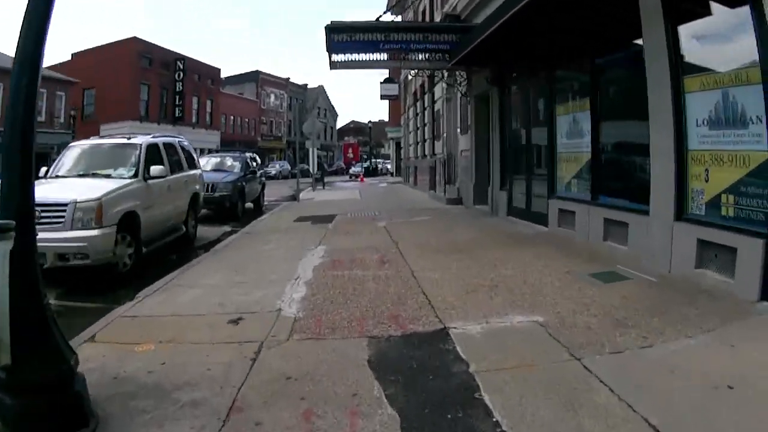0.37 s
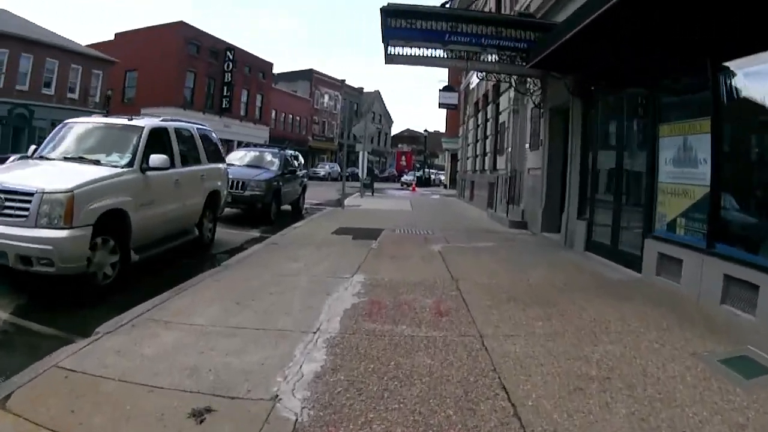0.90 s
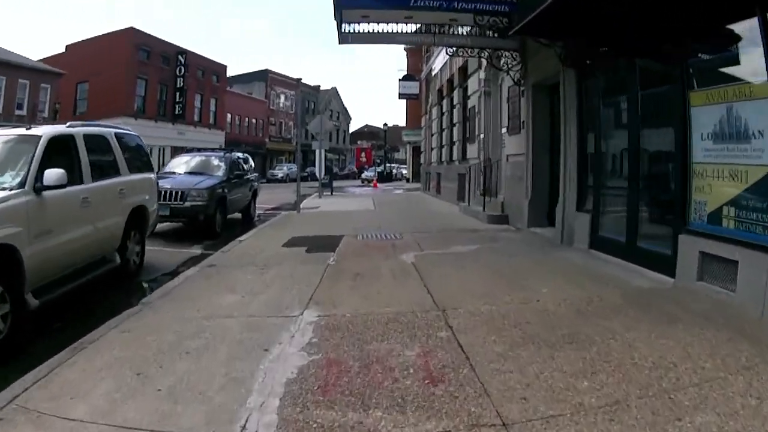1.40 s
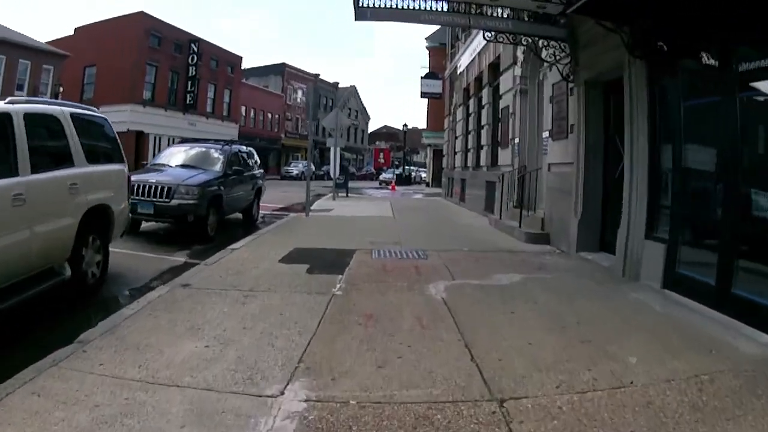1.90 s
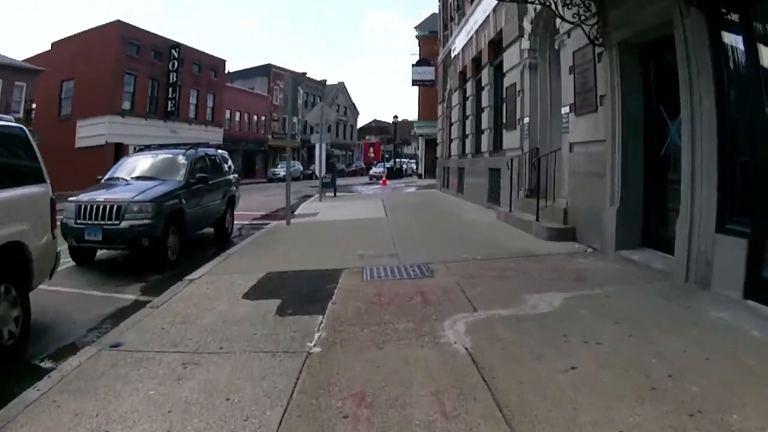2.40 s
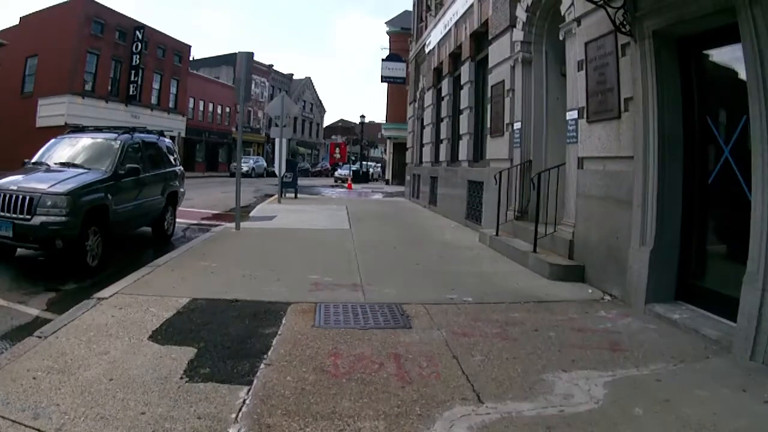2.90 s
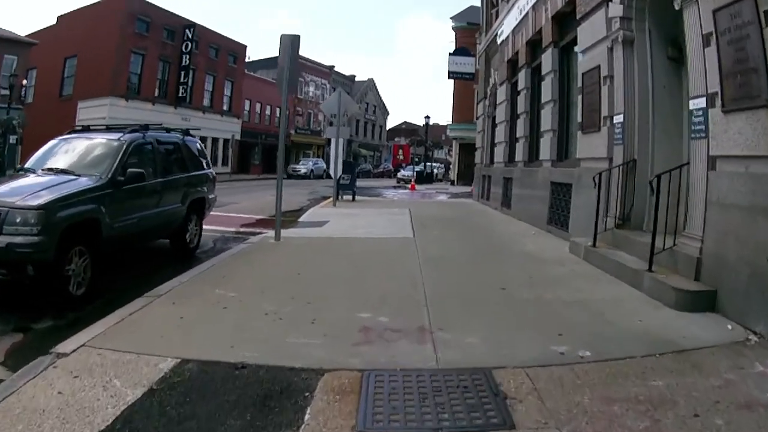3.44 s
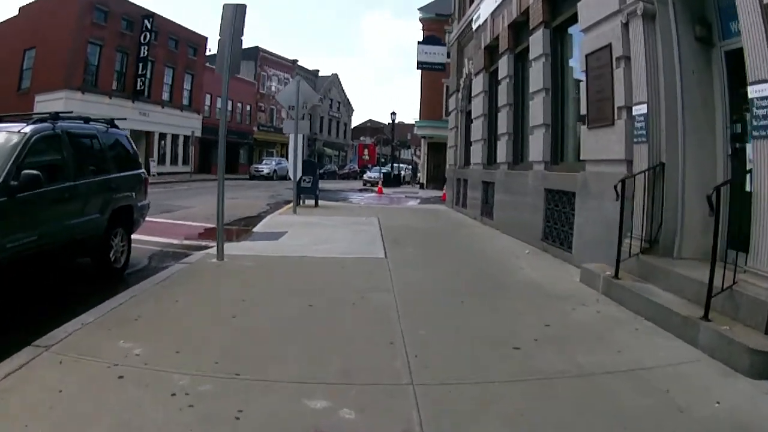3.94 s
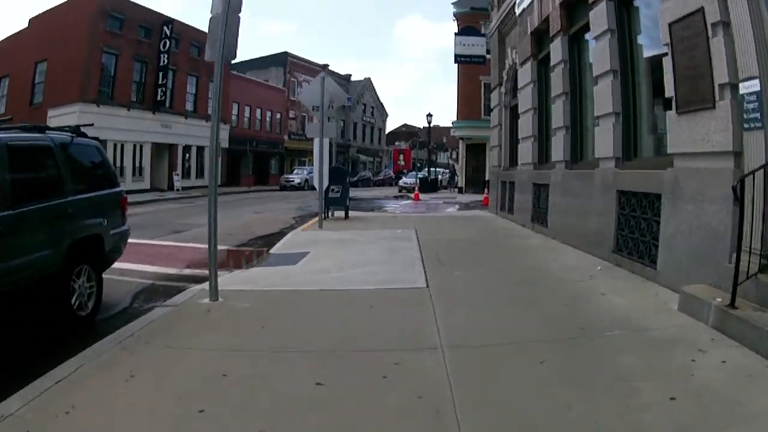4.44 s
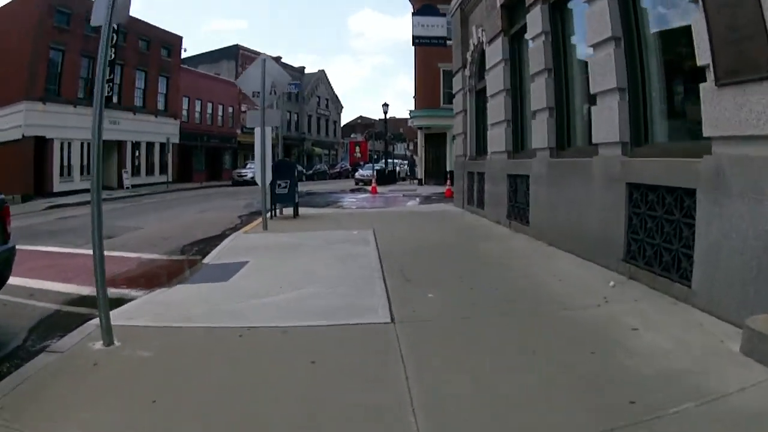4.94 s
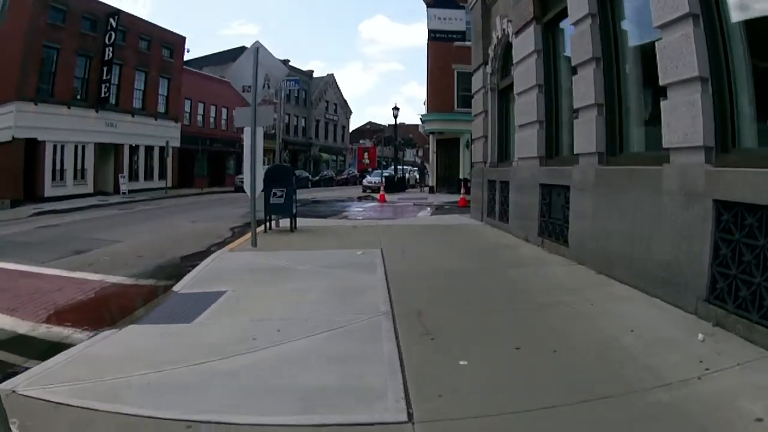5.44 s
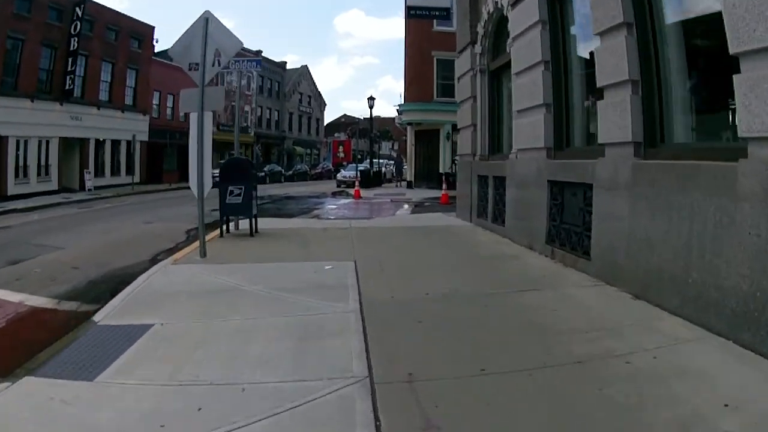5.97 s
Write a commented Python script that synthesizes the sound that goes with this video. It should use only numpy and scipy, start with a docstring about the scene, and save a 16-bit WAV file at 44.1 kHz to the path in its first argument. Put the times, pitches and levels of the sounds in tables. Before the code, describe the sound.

A bicycle coasts for about six seconds along a concrete sidewalk beside a town street, heard in mono from a microphone fixed to the frame. It opens with a strong gust of wind and tyre rumble that drops within the first 0.2 s, then eases gradually. Muffled tread roar and thin hiss stay well below. Deep, throbbing clamp shudders come irregularly throughout, with slower lurches beneath. Small clicks fall at 0.4 and 0.65 s; soft thumps at 0.75, 2.3 and 2.65-2.95. A sharp bright click snaps at 2.45, and a hard pair at 3.5. Bumps follow at 3.95 and, strongest, 4.4, with a cluster of faint dull ticks from 4.3 to 4.7. A faint low tone swells around 4.7 and again near 5.8. Very quiet freewheel ticking, about thirty-five per second, slows after 5 s and becomes slightly clearer. The treble is grainy and metallic.

```python
"""Low rumble and a shudder come first: a bicycle coasts along a concrete sidewalk with a camera clamped on.
The one microphone rides on the frame, which carries up wind and tyre rumble, tread roar and a thin hiss.
The clamp shudders on the joints, the freewheel ticks and loose parts click; a faint low tone swells twice.
Noise is shaped by frequency, wandering tones make the shudder, and struck modes the ticks and clicks.
The camera samples slowly and holds each value, which mirrors the sound in the treble."""
import sys
import numpy as np
from scipy import signal
from scipy.fft import rfft, irfft, next_fast_len
from scipy.io import wavfile
from scipy.ndimage import uniform_filter1d

SR = 44100
rng = np.random.default_rng(int(sys.argv[2]) if len(sys.argv) > 2 else 0)


def pcm_store(signal):
    """Save signal as 16-bit PCM."""
    levels = np.round(np.clip(np.atleast_2d(signal), -1, 1) * 32767)
    wavfile.write(sys.argv[1], SR, levels.astype(np.int16).T)


def ratio(d):
    """dB to gain"""
    e = np.asarray(d, float) / 20
    return 10 ** e


N = 268557

# Colours of tyre rumble with wind, tread roar and thin hiss: pitch_hz [Hz], relative level_db [dB per Hz]
RUMBLE_COLOUR = [(15, -37), (25, -49), (43, -7), (75, -3.5), (102, 1), (124, -10.5), (227, -6), (255, -15),
                 (330, -58), (560, -120)]
ROAR_COLOUR = [(170, -27), (295, 0), (322, -2.5), (366, -5), (400, -2.5), (466, -14), (538, -9.5),
               (564, -17), (652, -20), (863, -18.5), (1260, -22.5), (1480, -31.5), (1600, -27.5),
               (1880, -42), (2000, -39), (2600, -44), (4400, -120)]
HISS_COLOUR = [(1090, -36), (1850, -20), (2240, -5), (2850, -6), (3310, -0.5), (4030, -1.5), (4470, 2.5),
               (5030, -3.5), (6000, -5.5), (7800, -51), (13200, -120)]
# How hard ground and air work on the bicycle, mostly easing as it slows:
# time_s [s], level_db of wind and tyre rumble [dB]
ROUGHNESS = [(0.02, -16), (0.12, -20), (0.19, -24.5), (0.7, -26.5), (1.45, -30), (1.7, -28.5), (2.7, -30),
             (3.1, -31), (3.42, -33), (3.65, -30), (3.86, -31.5), (4.02, -30.5), (4.27, -32.5),
             (4.45, -30.5), (4.7, -33), (5.1, -35.5), (5.95, -36.5)]
# Brief thumps as a tyre meets a bump: time_s [s], peak_db [dB]
BUMPS = [(0.192, -34), (0.264, -21), (0.356, -27), (0.763, -19), (2.31, -20), (2.377, -22), (2.657, -16),
         (2.878, -13.5), (2.939, -16), (3.889, -25), (3.957, -14.5), (4.376, -10)]
# Slower lurches of the whole frame: start_s [s], length_s [s], level_db at the middle [dB]
LURCHES = [(0.06, 0.1, -27), (0.256, 0.072, -30.5), (0.38, 0.038, -32), (0.454, 0.072, -41),
           (0.593, 0.12, -21.5), (0.792, 0.073, -23), (0.99, 0.037, -29), (1.569, 0.16, -28.5),
           (1.995, 0.23, -26.5), (2.286, 0.074, -27), (2.412, 0.13, -20), (2.557, 0.072, -26.5),
           (2.733, 0.036, -24), (3.487, 0.12, -26), (3.906, 0.048, -25), (4.121, 0.12, -26.5),
           (4.406, 0.12, -26.5)]
# Clamp set shuddering by each joint or crack:
# middle_s [s], length_s [s], level_db at the middle [dB], pitch_hz [Hz]
SHUDDERS = [(0.092, 0.13, -17.5, 55.88), (0.473, 0.22, -24.5, 55.53), (0.67, .1, -29, 58.3),
            (0.86, 0.22, -22, 55.7), (1.06, 0.12, -26, 53.7), (1.22, 0.26, -22.5, 56.2),
            (1.48, 0.058, -29, 49.56), (1.767, 0.15, -24.5, 53.7), (1.902, 0.069, -28, 63),
            (2.11, 0.12, -33, 65.6), (2.469, 0.23, -20.5, 55.5), (2.61, 0.22, -26.5, 56.22),
            (2.92, 0.15, -29.5, 50.8), (3.092, 0.16, -20.5, 52.3), (3.455, 0.18, -21, 57.38),
            (3.6, 0.22, -19, 58.7), (3.772, 0.064, -21, 57.34), (3.932, 0.072, -24, 56.3),
            (4.424, 0.15, -24.5, 56.7), (4.618, 0.11, -22, 58.2), (4.733, 0.1, -33.5, 58.3),
            (5.094, 0.063, -23, 56.95), (5.209, 0.07, -25.5, 53.97), (5.372, 0.28, -29, 58.42),
            (5.801, 0.1, -28, 54.14), (6.075, .1, -27, 57.14)]
# Swells of the faint low tone: middle_s [s], length_s [s], level_db at the middle [dB]
HUM_SWELLS = [(4.72, 0.55, -37.5), (5.8, 1.77, -42)]
# Modes of the bright thin part, the dull part and the freewheel pawl:
# pitch_hz [Hz], level_db [dB], t60_s [s], sense of swing [+1 or -1]
BRIGHT_PART = [(2170, -16, .012, 1), (2590, -7, .014, -1), (3100, -6, .008, -1), (3700, -9, .007, 1),
               (4050, -10, .006, -1), (4450, -7, .009, 1), (4670, -27, .09, -1), (4870, 0, .008, -1),
               (5400, -4, .007, 1), (5800, -12, .006, -1)]
DULL_PART = [(1090, 4, 0.02, 1), (1611, 9.5, 0.022, -1), (2250, -2, 0.018, 1)]
PAWL = [(1700, -8, .015, 1), (2200, 0, .012, -1), (2550, -2, .011, 1), (3400, -7, .008, -1)]
# The wheel slows gently, then more: time_s [s], ratchet teeth_per_s [1/s]
WHEEL = [(0, 35), (2.6, 34.4), (3, 33.6), (4, 33.4), (4.75, 33.4), (5.25, 31), (5.55, 26.5), (6.09, 26.5)]
# Blows on the loose parts: time_s [s], bright_peak_db [dB], dull_peak_db [dB],
# dullness of the blow on the bright part [dB per octave], contact_s [s]
CLICKS = [(0.383, -31.5, -46, -3, 0.0021), (0.402, -40, -59, 5, 0.003), (0.639, -30.5, -50, 3, 0.0011),
          (0.943, -43, -44, 9, 0.002), (1.057, -43.5, -55, 5, 0.0024), (1.494, -45, -49, 11, 0.0006),
          (1.5157, -58, -36.5, 8, 0.0057), (2.042, -49, -44, 8, 0.00037), (2.16, -43.5, -46, 6, 0.00096),
          (2.4412, -17, -52, -4, 0.00074), (2.556, -47, -59, -3, 0.00074), (2.824, -49, -41, -6, 0.0018),
          (3.5069, -27, -40, 1, 0.0014), (3.509, -15, -28.5, 2.5, 0.0012),
          (3.5443, -14, -29.5, -2.5, 0.0012), (3.598, -46, -36.5, 2, 0.003), (3.713, -50, -48, 3, 0.0017),
          (3.724, -43, -46, 9, 0.0023), (3.843, -46.5, -56, 14, 0.0017), (4.288, -45, -44, 11, 0.001),
          (4.404, -44, -49, 6, 0.00043), (4.428, -49, -41, 0, 0.00088), (4.486, -41, -37, 13, 0.00082),
          (4.528, -48, -41, -2, 0.00035), (4.574, -43, -35, 4, 0.00054), (4.607, -48, -45, -6, 0.0012),
          (4.651, -45.5, -38, 4, 0.0023), (4.722, -58, -39, 0, 0.0014), (5.11, -48, -65, 6, 0.00063),
          (5.201, -42, -65, 3, 0.0012)]


def evened(x):
    """Scales to rms 1."""
    return x / np.sqrt(np.mean(x ** 2) + 1e-20)


def column(rows, index):
    """One column of a curve, at every sample."""
    rows = np.array(rows)
    return np.interp(np.arange(N) / SR, rows[:, 0], rows[:, index])


def following(db, share):
    """Gain of a layer that follows the roughness by a share; it stands at db when the roughness is -30 dB."""
    return ratio(db + share * (column(ROUGHNESS, index=1) + 30))


def swells(middles, lengths, levels_db):
    """Smooth rises and falls, one for each event, added in power."""
    t, power = np.arange(N) / SR, np.zeros(N)
    for middle, length, db in zip(middles, lengths, levels_db):
        power += ratio(db) ** 2 * np.exp(-8 * ((t - middle) / length) ** 2)
    return np.sqrt(power)


def noise(points, patchy_db, flicker_db, size):
    """Random short-time spectra with drifting patches and a flicker shared by all frequencies."""
    frames = 4 * N // size + 6
    hz = np.fft.rfftfreq(size, 1 / SR)
    real, imaginary, patches = rng.standard_normal((frames, len(hz), 3)).T
    patches = uniform_filter1d(patches, size=8, axis=0)
    patches = evened(uniform_filter1d(patches, size=6, axis=1))
    point_hz, point_db = np.transpose(points)
    colour = np.interp(np.log(hz + 1), np.log(point_hz + 1), point_db, left=-120, right=-120)
    flicker = rng.standard_normal(frames)
    level_db = colour[:, None] + patchy_db * patches + flicker_db * flicker
    spectra = (real + 1j * imaginary) * ratio(level_db)
    sound = signal.istft(spectra, nperseg=size, noverlap=3 * size // 4)[1]
    return evened(sound[:N])


def wobble(hz, width_hz):
    """A low tone of rms 1, steady in size and wandering in pitch."""
    drift = uniform_filter1d(rng.standard_normal(N), size=1500)
    drift = evened(uniform_filter1d(drift, size=1500))
    return np.sqrt(2) * np.sin(2 * np.pi * np.cumsum(hz + width_hz * drift) / SR)


def ring(modes, dull_db=0.0):
    """The answer of a set of modes to one impulse; dull blows favour the low modes."""
    hz, db, t60, sense = np.transpose(modes)[:, :, None]
    t = np.arange(SR // 8) / SR
    level = np.sign(sense) * ratio(db - dull_db * np.log2(hz / 3000) - 60 * t / t60)
    onset = 1 - np.exp(-t / 0.00032)
    return (level * np.sin(2 * np.pi * hz * t) * onset).sum(0)


def hiss():
    """Thin hiss: one part follows the roughness, a steady part adds to it in power."""
    level = np.hypot(following(-74, share=1.02), ratio(-66))
    return level * noise(HISS_COLOUR, patchy_db=2.2, flicker_db=0.1, size=256)


def roar():
    """Roar of tread on concrete: shaped noise that follows the roughness."""
    return following(-38.5, share=0.7) * noise(ROAR_COLOUR, patchy_db=1.09, flicker_db=0.78, size=1024)


def rumble():
    """Wind and tyre rumble: low noise that rises quickly and dies away at each bump."""
    rise_s, fall_s, crest_db = 0.0064, 0.02, 10.5  # crest: from peak down to rms
    time_s, peak_db = np.transpose(BUMPS)[:, :, None]
    since = np.arange(N) / SR - time_s
    shape = np.exp(np.minimum(since / rise_s, -since / fall_s))
    thumps = (ratio(peak_db - crest_db) * shape).sum(0)
    level = np.hypot(ratio(column(ROUGHNESS, index=1)), thumps)
    return level * noise(RUMBLE_COLOUR, patchy_db=2.0, flicker_db=1.0, size=2048)


def hum():
    """A faint low tone, wandering slightly in pitch, that swells twice."""
    return swells(*np.transpose(HUM_SWELLS)) * wobble(146.7, width_hz=1.34)


def sway():
    """The whole frame lurches as a very low resonance, over a floor that follows the roughness."""
    start, length, db = np.transpose(LURCHES)
    level = np.hypot(swells(start + length / 2, length, db), following(-35, share=0.28))
    return level * wobble(37.8, width_hz=6.01)


def shudder():
    """The clamp resonates on each joint, gliding from pitch to pitch, over a floor that follows the roughness."""
    middle, length, db, hz = np.transpose(SHUDDERS)
    pitch = np.interp(np.arange(N) / SR, middle, hz)
    level = np.hypot(swells(middle, length, db), following(-46, share=0.28))
    return level * wobble(pitch, width_hz=3.07)


def rattle():
    """Faint chance contacts, each a tiny burst of noise, ring the bright loose part."""
    gain_db, contacts_per_s = -63, 17
    sizes = ratio(4.1 * np.minimum(rng.exponential(size=N), 3))
    hits = (rng.random(N) < contacts_per_s / SR) * sizes
    bursts = rng.standard_normal(N) * signal.oaconvolve(hits, np.hanning(70))[:N]
    tick = ring(BRIGHT_PART)
    return ratio(gain_db) * signal.oaconvolve(bursts, tick / np.linalg.norm(tick))[:N]


def freewheel():
    """The pawl drops over each ratchet tooth, unevenly, a little clearer as the wheel slows."""
    first_db, growth_db_per_s, spread_db = -60.5, 1.24, 2.0
    teeth = np.floor(np.cumsum(column(WHEEL, index=1)) / SR)
    drops = np.diff(teeth, prepend=teeth[0])
    size_db = first_db + growth_db_per_s * np.arange(N) / SR + spread_db * rng.standard_normal(N)
    tick = ring(PAWL)
    return signal.oaconvolve(drops * ratio(size_db), tick / abs(tick).max())[:N]


def clicks():
    """Each click is one firm contact and a brief scatter of small ones that ring both loose parts."""
    out, t = np.zeros(N + SR), np.arange(600) / SR
    scatter = 0.14 * rng.standard_normal((len(CLICKS), len(t)))  # against a firm contact of 1
    for (time_s, bright_db, low_db, dull_db, contact_s), small in zip(CLICKS, scatter):
        contacts = small * np.exp(-(t / contact_s) ** 2) + (t == 0)
        start = round(time_s * SR)
        for peak_db, tick in (bright_db, ring(BRIGHT_PART, dull_db)), (low_db, ring(DULL_PART)):
            sound = signal.fftconvolve(contacts, tick)
            peak = abs(signal.hilbert(sound)).max()
            out[start:start + len(sound)] += ratio(peak_db) * sound / peak
    return out[:N]


def scene():
    """Everything reaches the one microphone through the frame."""
    rolling = hiss() + roar() + rumble()
    frame = hum() + sway() + shudder()
    return (rolling + frame + rattle() + freewheel() + clicks())[None]


def slow_sampling(dry):
    """Each slow sample is held four times over, leaving mirror images around the sampling rate."""
    hold_hz, guard_hz = 12000, 6000
    guard = signal.firwin(101, guard_hz, window=("kaiser", 5), fs=SR)
    slow = signal.resample_poly(signal.oaconvolve(dry, guard[None], "same"), hold_hz, SR, axis=1)
    return signal.resample_poly(np.repeat(slow, 4, axis=1), SR, 4 * hold_hz, axis=1)


def edge_grit(held):
    """Sharp edges come out gritty: noise follows the short-time size of the second difference."""
    treble = np.diff(held, n=2, axis=1, prepend=0, append=0)
    sharpness = np.sqrt(abs(uniform_filter1d(treble ** 2, size=30)))
    return ratio(-21.5) * sharpness * rng.standard_normal(held.shape)


def top_octave(sound):
    """A slight lift near 12 kHz, a growing loss above, and nothing beyond the edge."""
    edge_hz = 15800
    size = next_fast_len(N + SR)
    hz = np.fft.rfftfreq(size, 1 / SR)
    colour_db = 0.5 * np.exp(-((hz - 12100) / 1500) ** 2) - 6.2 * (hz / edge_hz) ** 6
    return irfft(rfft(sound, size) * ratio(colour_db) * (hz < edge_hz), size)[:, :N]


def low_pass(x):
    """Removes everything above the highest recorded frequency."""
    return signal.sosfilt(signal.butter(12, 16590, fs=SR, output="sos"), x)


def record(dry):
    """The camera on the frame samples slowly, adds grit at sharp edges and colours the top octave."""
    held = slow_sampling(dry)
    finished = top_octave(held + edge_grit(held))
    return low_pass(finished)


dry = scene()
out = record(dry)
pcm_store(out)
```